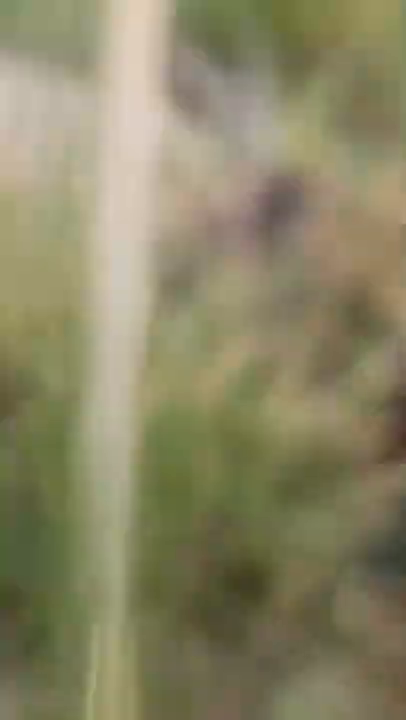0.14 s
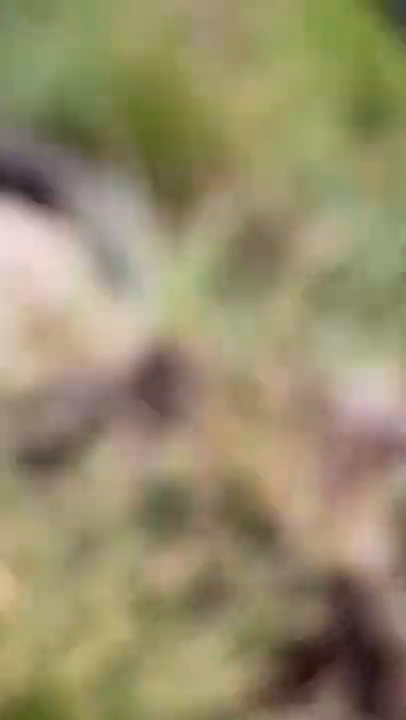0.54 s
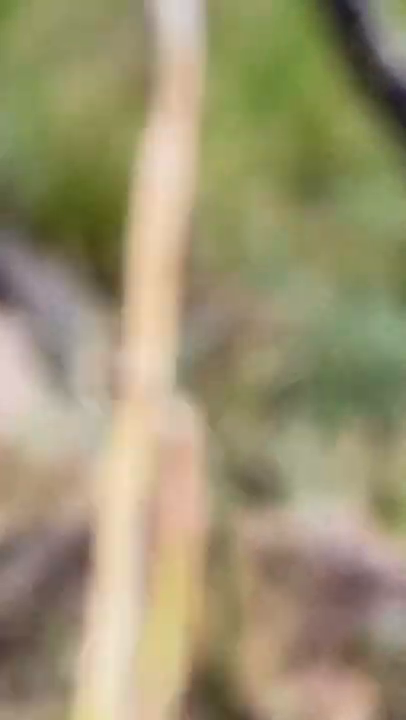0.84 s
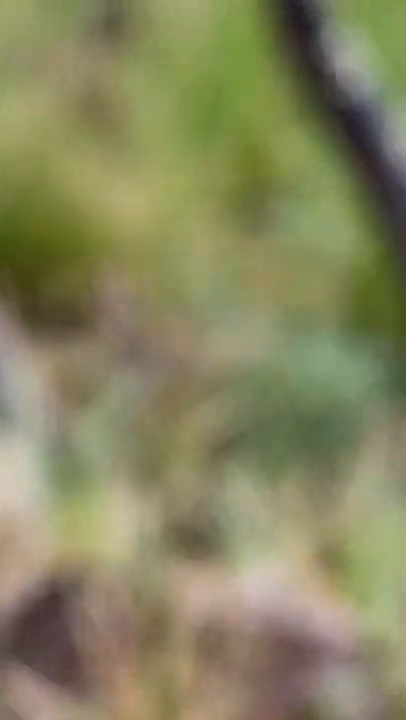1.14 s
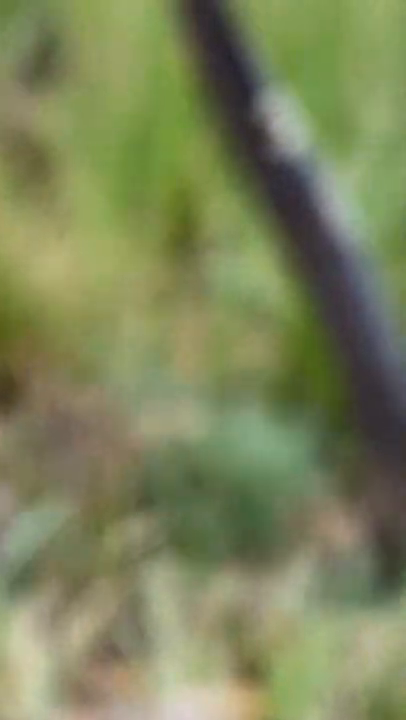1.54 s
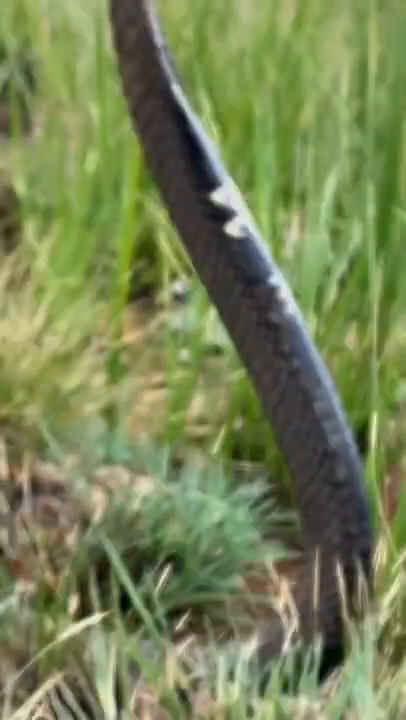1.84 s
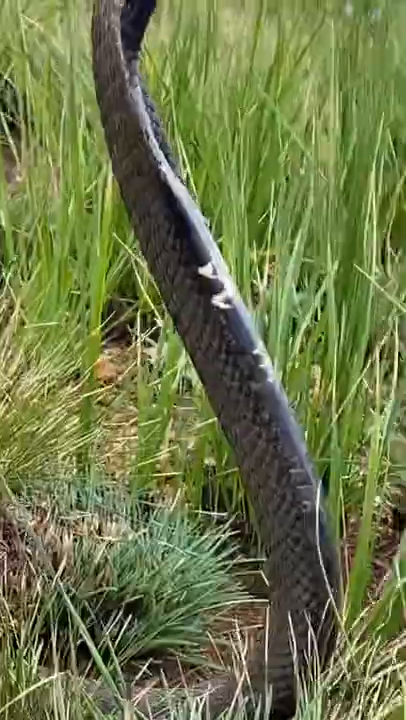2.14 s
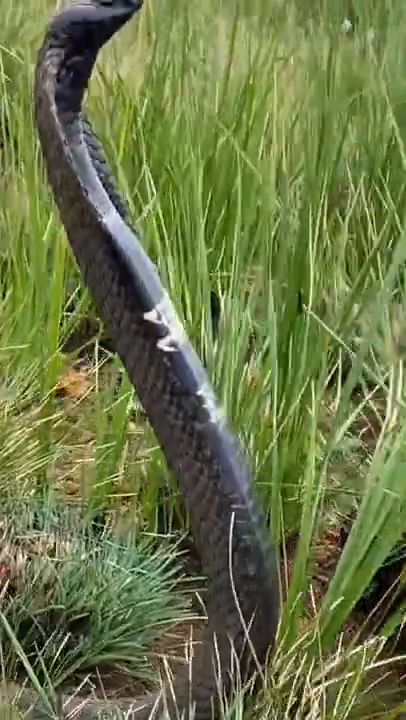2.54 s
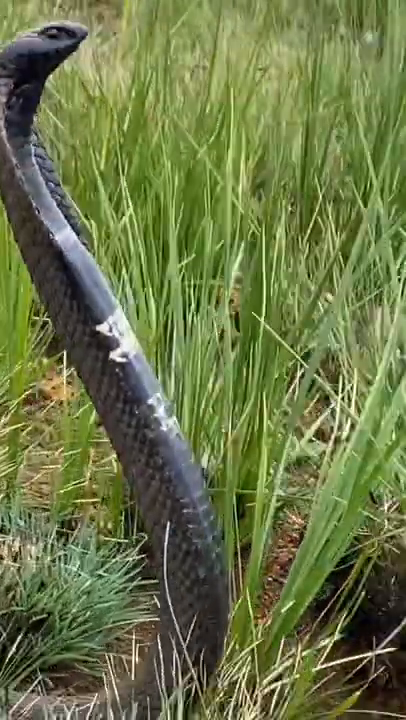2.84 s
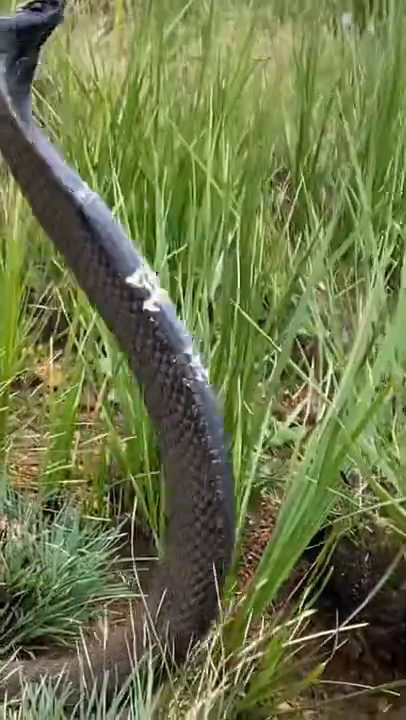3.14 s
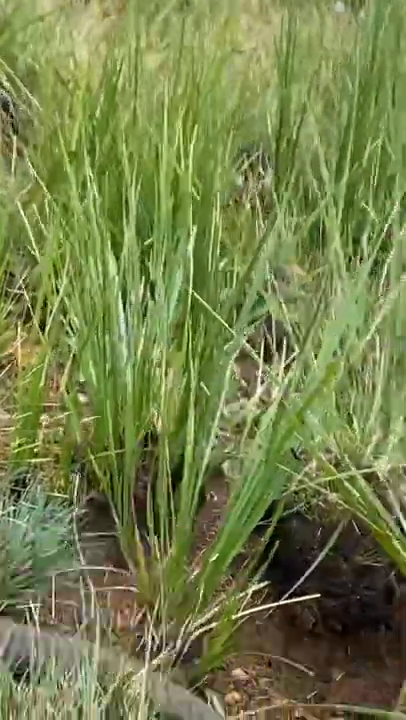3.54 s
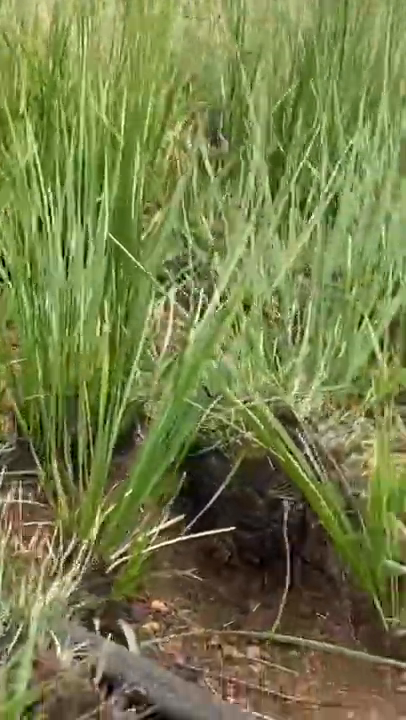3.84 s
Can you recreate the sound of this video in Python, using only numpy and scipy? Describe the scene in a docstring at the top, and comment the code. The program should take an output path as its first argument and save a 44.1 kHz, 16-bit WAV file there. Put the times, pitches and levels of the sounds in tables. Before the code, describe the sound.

A snake hisses in grass outdoors, close to a hand-held microphone. From 0 to 0.8 s stalks brush past with crackle, sharp snaps and dull taps, fading by 1.5. A thin, quiet, slowly falling hiss swells, strongest around 2.1, ending near 2.9 over soft grass rush. Wind thumps build. A loud airy spit bursts at 3.2-3.5, a slap lands at 3.5, then scales rustle and a low drag continues to 4 s.

```python
"""A reared snake in tall grass, close to a hand-held camera, with the soft rush of the grass behind.
First the camera pushes through stalks: patchy noise, crackle, band-passed snaps and ringing taps.
Then a long thin hiss swells, breath noise through gliding resonances. Wind rumble and sagging sine puffs
gather on the microphone. The snake spits a loud noise burst through its sinking mouth resonance,
drops with a slap of noise and two low tones, and slides off in scale noise and a low drag."""
import sys
import numpy as np
from scipy import signal
from scipy.fft import rfft, irfft, next_fast_len
from scipy.io import wavfile
from scipy.ndimage import uniform_filter1d, map_coordinates

SR = 44100
rng = np.random.default_rng(int(sys.argv[2]) if len(sys.argv) > 2 else 0)


def generate_wav(signal):
    """Clip the signal to [-1, 1] and save it as 16-bit WAV at the path in sys.argv[1]."""
    frames = np.transpose(np.atleast_2d(signal))
    scaled = np.clip(frames, -1, 1) * 32767
    pcm = np.round(scaled).astype(np.int16)
    wavfile.write(sys.argv[1], SR, pcm)


N = 176400
T = np.arange(N) / SR  # seconds


def amp(db):
    """dB to gain."""
    return 10 ** (np.asarray(db) / 20)


def along(points, hz):
    """Read (Hz, value) points on a log frequency axis."""
    f, v = np.transpose(points)
    return np.interp(np.log(hz + 1), np.log(f + 1), v)


def curve(rows, t=T):
    """One straight-line curve per column after the time."""
    s, *cols = np.transpose(rows)
    return [np.interp(t, s, c) for c in cols]


def wobble(rate):
    """Smooth random curve with this many knots a second."""
    return map_coordinates(rng.standard_normal(int(4 * rate) + 5), [T * rate])


def add(out, s, sound):
    """Mix a sound in at time s."""
    i = round(s * SR)
    out[i:i + len(sound)] += sound[:N - i]


# Stereo width of the noises. Each row: frequency in Hz, side level in dB under the middle.
SIDE_WIDTH = [(60, -15.5), (700, -6), (1400, -1.5), (2200, -13), (3500, -33), (4500, -62)]


def coloured(x, gain, patchy_db):
    """Shape mid and side by gain(Hz, s), with random patches in time and frequency."""
    hz, t, z = signal.stft(x, SR, nperseg=1024)
    patches = rng.standard_normal(z.shape[1:])
    patches = uniform_filter1d(patches, size=10, axis=0)
    patches = uniform_filter1d(patches, size=6, axis=1)
    z = z * gain(hz[:, None], t) * amp(patchy_db * patches / patches.std())
    z[1] *= amp(along(SIDE_WIDTH, hz))[:, None]
    return signal.istft(z, SR, nperseg=1024)[1][:, :N]


def rush(tone, level_db, patchy_db, grit=0):
    """Noise of a given colour; the level is that of a 3.5 kHz wide band at 0 dB of the colour."""
    noise = rng.standard_normal((2, N)) + grit
    shaped = coloured(noise, lambda hz, t: amp(along(tone, hz)), patchy_db)
    return shaped * np.sqrt(SR / 2 / 3500) * amp(level_db)


def crackle(per_s, db, spread_db):
    """Short noise scrapes of random size; a wobbling rate around per_s makes clumps."""
    hit = rng.random(N) < per_s / SR * amp(4 * wobble(20))
    size = hit * amp(db + spread_db * np.minimum(rng.exponential(size=N), 2.2))
    decay = 4 * np.exp(-T[:200] / 0.0011)
    return np.convolve(size, decay)[:N] * rng.standard_normal((2, N))


def snake():
    """The snake's voice and body; the burst, slide and slap keep a narrow side, as it stands in the middle."""
    near = spit() + slide() + slap()
    near_side_db = -10.5
    breath = hiss(HISS) + hiss(LOW_HISS) + hiss(DEEP_HISS)
    return breath + near * amp([[0], [near_side_db]])


# Indrawn hiss through the windpipe, its second band, and a short deeper band.
# Each row: time in seconds, resonance in Hz, level in dB.
HISS = [(1.15, 3560, -81), (1.45, 3440, -79), (1.8, 3190, -74), (2.1, 3070, -70), (2.88, 2936, -73.5),
        (2.98, 3020, -99)]
LOW_HISS = [(.6, 2780, -88), (.9, 2850, -76), (1.45, 2770, -77.5), (2.05, 2460, -90)]
DEEP_HISS = [(1.8, 1160, -99), (1.88, 1050, -74), (2.1, 1110, -81.5), (2.2, 1130, -99)]
HISS_WIDTH_HZ, HISS_SKIRT_DB = 460, -10.5


def hiss(rows, width_hz=HISS_WIDTH_HZ):
    """Breath noise through one gliding resonance, cut sharply below and trailing off above."""
    def gain(hz, t):
        centre, db = curve(rows, t)
        off = (hz - centre) / (width_hz / 2)
        peak = 1 / (1 + off ** 4) ** 1.63
        skirt = amp(HISS_SKIRT_DB) * (off > 0) / (1 + (off / 4.1) ** 4)
        return amp(db) * (peak + skirt) * np.sqrt(SR / 2 / width_hz)
    return coloured(rng.standard_normal((2, N)), gain, patchy_db=1.4)


# The spat burst. Each row: time in seconds, level at 4.5-8 kHz in dB.
SPIT = [(3.04, -120), (3.15, -80), (3.2, -62), (3.26, -55), (3.33, -50.5), (3.4, -54.5), (3.45, -56.5),
        (3.56, -63.5), (3.7, -110)]
# Its colour. Each row: frequency in Hz, gain in dB.
SPIT_TONE = [(200, 7), (500, 7.5), (1100, 3.5), (1600, -6), (2400, -0.5), (3600, 1.5), (5500, 0),
             (8000, -1), (9500, 10.5), (11000, 3), (15500, -9)]
# The sinking mouth resonance. Each row: time in seconds, resonance in Hz, level in dB.
SPIT_MOUTH = [(3.12, 5800, -125), (3.22, 5400, -64), (3.37, 3900, -57), (3.47, 4370, -63),
              (3.6, 4400, -125)]


def spit():
    """A burst of turbulent air, plus a broad mouth resonance gliding through it."""
    return rush(SPIT_TONE, curve(SPIT)[0], patchy_db=2.0) + hiss(SPIT_MOUTH, width_hz=2200)


# Colour of the slap on the grass. Each row: frequency in Hz, gain in dB.
SLAP_TONE = [(150, 7.5), (700, 18), (2000, -4.5), (4400, 3), (10000, 1.5), (15500, 1)]
SLAP_S, SLAP_DB = 3.5015, -47
SLAP_RISE_S, SLAP_LENGTH_S, SLAP_T60_S = 0.0054, .012, .012  # the decay follows the length
THUD_HZ, THUD_DB, THUD_T60_S = 338, -16.5, 0.013  # before rectifying, which doubles the pitch
BODY_HZ, BODY_DB, BODY_T60_S = 185, -29, 0.074


def slap():
    """The body hits the ground: noise as the grass flattens, a rectified thud and a low body tone."""
    t = T - SLAP_S
    rise = np.clip(t / SLAP_RISE_S, 0, 1)
    fall = amp(-60 * np.clip(t - SLAP_LENGTH_S, 0, 1) / SLAP_T60_S)
    sound = rush(SLAP_TONE, SLAP_DB, patchy_db=-1) * rise * fall
    thud = amp(THUD_DB - 60 * np.abs(t) / THUD_T60_S) * np.abs(np.sin(2 * np.pi * THUD_HZ * t))
    body = amp(BODY_DB - 60 * np.abs(t) / BODY_T60_S) * np.sin(2 * np.pi * BODY_HZ * t)
    sound[0] += (t > 0) * (thud + body)
    return sound


# Scales over grass. Each row: time in seconds, level at 4.5-8 kHz in dB before the wobble.
SLIDE = [(3.3, -130), (3.5, -72.5), (3.6, -63.5), (3.78, -65), (4, -70)]
# The heavy body dragging on soil. Each row: time in seconds, level in dB.
DRAG = [(3.45, -120), (3.58, -44), (4, -40.5)]
# Colours of the two. Each row: frequency in Hz, gain in dB.
SLIDE_TONE = [(620, 4), (900, 9.5), (1200, -4.5), (1900, 1), (4400, 2.5), (8300, -1.5), (9500, 8.5),
              (15500, -13.5)]
DRAG_TONE = [(230, -24), (330, -0.5), (410, 1.5), (490, -7.5), (600, -38)]


def slide():
    """Scales rub over grass in unsteady bright noise while the body drags in a low band."""
    scales = rush(SLIDE_TONE, curve(SLIDE)[0] + wobble(30.57), patchy_db=2.0)
    return scales + rush(DRAG_TONE, curve(DRAG)[0], patchy_db=0.5)


def stalks():
    """The camera pushes through stalks, which brush, snap in the middle and tap its body."""
    return brush() + snaps() * np.array([[1], [0]]) + taps() * np.array([[1], [-.3]])


# Brushing stalks. Each row: time in seconds, level at 4.5-8 kHz in dB before the crackle.
STALKS = [(0, -63), (.3, -63), (.44, -68), (.75, -72), (.98, -76.5), (1.03, -70), (1.15, -83.5),
          (1.4, -80.5), (1.6, -110)]
# Their colour. Each row: frequency in Hz, gain in dB.
STALK_TONE = [(100, 3), (600, 4), (1500, 2), (3000, 1), (8500, -4.5), (9700, -0.5), (15500, -8)]


def brush():
    """Stalks rub past: a rush of friction noise, roughened by clumps of scrapes."""
    scrapes = crackle(per_s=260, db=-11, spread_db=4)
    return rush(STALK_TONE, curve(STALKS)[0], patchy_db=2., grit=scrapes)


# Stalks snap. Each row: start in seconds, peak level in dB, band centre in Hz.
SNAPS = [(0.0104, -37, 7450), (0.08, -45, 6900), (0.0988, -39, 7000), (0.1356, -34, 4800),
         (0.2464, -34.5, 7550), (0.2676, -40, 4800), (0.4733, -49, 3180), (0.48, -41.5, 7460),
         (0.5971, -39, 5800), (0.665, -39, 5660), (0.7826, -52, 2680), (2.0905, -44, 7600),
         (3.5016, -33.5, 1800)]
SNAP_T60_S = .005


def snaps():
    """Each breaking stalk is a very short band of noise."""
    hits, t = np.zeros(N), T[:3000]
    for s, db, hz in SNAPS:
        band = signal.butter(2, [hz * 0.72, min(hz * 1.52, 15000)], "band", fs=SR)
        shape = amp(-60 * t / SNAP_T60_S) * (1 - np.exp(-t / .0002))
        burst = signal.lfilter(*band, rng.standard_normal(len(t)) * shape)
        add(hits, s, amp(db) * burst / np.abs(burst).max())
    return hits


# Stalks tap the body. Each row: start in seconds, level in dB before the ring's own gain, pitch in Hz.
KNOCKS = [(0.021, -48, 400), (0.136, -45, 635), (0.262, -41.5, 1313), (0.475, -42, 1423),
          (0.509, -54.5, 1270), (0.607, -51.5, 592), (0.693, -57, 1680), (1.012, -57, 670),
          (1.167, -61.5, 610), (1.34, -60, 640)]
KNOCK_T60_S = 0.02


def taps():
    """Each dull tap rings in two damped modes, with a fast random flutter of strength."""
    knocks, t = np.zeros(N), T[:3000]
    for s, db, hz in KNOCKS:
        low_mode = np.sin(2 * np.pi * hz * 0.453 * t + rng.uniform(0, 5.1))
        ring = np.sin(2 * np.pi * hz * t) + 0.62 * low_mode
        shape = amp(db - 60 * t / KNOCK_T60_S) * (1 - np.exp(-t / 0.0012))
        flutter = 2 + .5 * wobble(530)[:len(t)]
        add(knocks, s, shape * ring * flutter)
    return knocks


def wind():
    """Air moving over the microphone makes rumble and single thumps."""
    return rumble() + puffs()


# Wind rumble. Each row: time in seconds, level in dB before the wobble.
WIND = [(0, -59), (1, -66.5), (1.06, -56), (1.16, -57), (1.2, -68), (1.57, -67.5), (2.02, -62), (2.2, -54),
        (2.65, -61), (2.75, -49), (3.08, -52), (3.2, -37), (3.6, -39.5), (3.75, -48), (3.85, -41), (4, -40)]
# Its colour. Each row: frequency in Hz, gain in dB.
WIND_TONE = [(20, -45), (35, 15), (60, 11.5), (100, 6), (180, -10.5), (300, -31)]


def rumble():
    """Turbulence as low noise with a lumpy level."""
    return rush(WIND_TONE, curve(WIND)[0] + 3 * wobble(24), patchy_db=1.5)


# Wind puffs. Each row: start in seconds, level in dB before rise and decay, settled pitch in Hz.
PUFFS = [(2.733, -44.5, 85), (2.844, -42, 65.4), (2.896, -32.5, 72.6), (3.101, -25.5, 77.7),
         (3.188, -28, 58.5), (3.24, -31.5, 71), (3.284, -23.5, 64), (3.322, -31.5, 86), (3.494, -24.5, 71),
         (3.523, -25, 59), (3.578, -26, 54), (3.676, -38, 67.4), (3.906, -28, 109), (3.936, -24, 148)]
PUFF_RISE_S, PUFF_CYCLES = 0.003, 13.7  # cycles to die by 60 dB
PUFF_LEAD_S, PUFF_SAG_S = 0.18 * 0.012, 0.0051  # their ratio is the share by which pitch starts high
PUFF_SKEW = .14  # a puff reaches one port a little before the other


def puffs():
    """Each puff is a damped low sine whose pitch sags, with a quarter-cycle shifted copy in the side."""
    thumps, t = np.zeros(N, complex), T[:SR // 2]
    for s, db, hz in PUFFS:
        cycles = hz * (t + PUFF_LEAD_S * (1 - np.exp(-t / PUFF_SAG_S)))
        rise = 1 - np.exp(-(t / PUFF_RISE_S) ** 2)
        decay = amp(db - 60 * t * hz / PUFF_CYCLES)
        add(thumps, s, decay * rise * np.exp(2j * np.pi * cycles))
    return np.array([thumps.imag, PUFF_SKEW * thumps.real])


# Soft rush of the grass. Each row: time in seconds, level at 4.5-8 kHz in dB before crackle and wobble.
MEADOW = [(1.3, -80), (1.6, -81), (1.9, -77.5), (2.12, -77), (2.92, -78.5), (3.03, -89), (3.15, -76)]
# Its colour. Each row: frequency in Hz, gain in dB.
MEADOW_TONE = [(100, 18.5), (300, 12.5), (700, -5.5), (1500, -11), (2400, -0.5), (3000, 2.5), (4600, 0),
               (8000, -7.5), (9700, 2.5), (12000, -8), (15500, -21)]


def meadow():
    """Grass rubs together: soft noise with sparse crackle and a slight wobble."""
    scrapes = crackle(per_s=87, db=-10.5, spread_db=3.1)
    return rush(MEADOW_TONE, curve(MEADOW)[0] + 0.23 * wobble(11), patchy_db=1.5, grit=scrapes)


# Dull low part of the grass. Each row: time in seconds, level at 0.5-1.3 kHz in dB before the wobble.
MURMUR = [(0, -59), (.25, -66.5), (.5, -79), (1.3, -79.5), (1.6, -81.5), (2.1, -73), (2.25, -80),
          (2.42, -71.5), (2.6, -78.5), (3.05, -73)]
# Its colour. Each row: frequency in Hz, gain in dB.
MURMUR_TONE = [(200, 7), (450, 8), (1150, 3), (1400, -9), (2000, -36)]


def murmur():
    """The grass's dull low noise, patchy and wobbling in level."""
    return rush(MURMUR_TONE, curve(MURMUR)[0] + 2.0 * wobble(19), patchy_db=3.0)


def scene():
    """All sources, from mid and side to left and right."""
    mid, side = snake() + stalks() + wind() + meadow() + murmur()
    return np.array([mid + side, mid - side])


TURN_FROM_HZ, TURN_HZ = 7057, 4030  # above the first, channels turn one cycle apart per TURN_HZ, two at most
TURN_BEND = 0.25  # how far the phase ramp is bent into soft steps
LOW_CUT_HZ, TOP_HZ = 38, 15850


def record(dry):
    """Turns the treble phase between channels, thins the lows and stops at TOP_HZ."""
    m = next_fast_len(N + 8192)
    hz = np.fft.rfftfreq(m, 1 / SR)
    turn = np.pi * np.clip((hz - TURN_FROM_HZ) / TURN_HZ, 0, 2)
    turn = turn - TURN_BEND * np.sin(4 * turn) / 4
    phase = np.exp(1j * turn * np.array([[-1], [1]]))
    low_cut = (1j * hz / (1j * hz + LOW_CUT_HZ)) ** 2
    return irfft(rfft(dry, m) * phase * (hz < TOP_HZ) * low_cut, m)[:, :N]


dry = scene()
out = record(dry)
generate_wav(out)
```